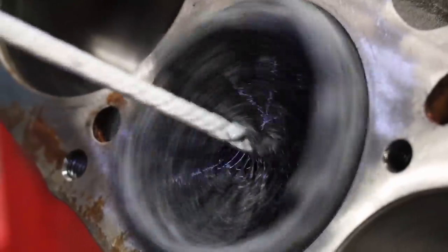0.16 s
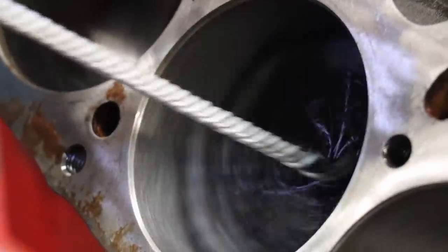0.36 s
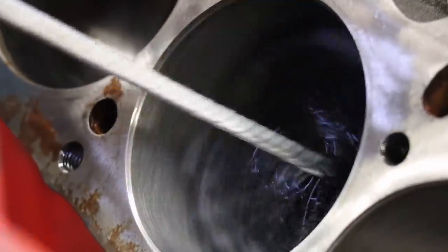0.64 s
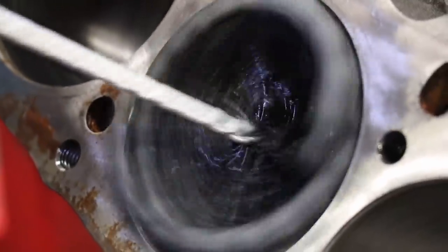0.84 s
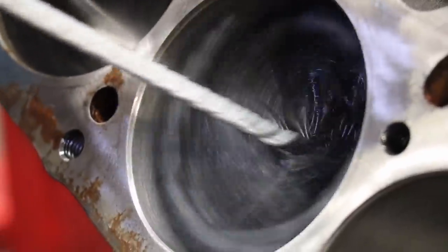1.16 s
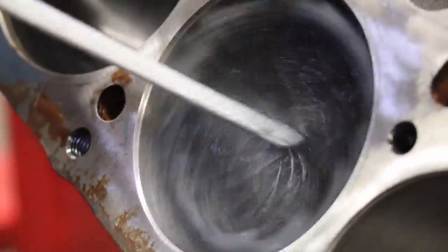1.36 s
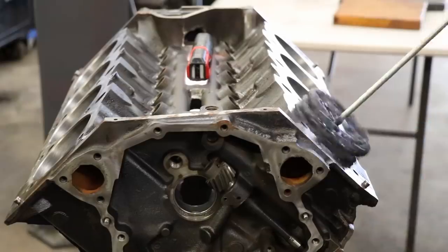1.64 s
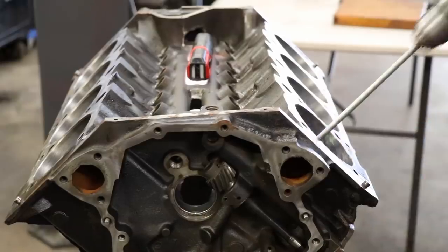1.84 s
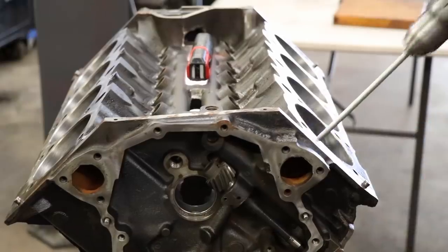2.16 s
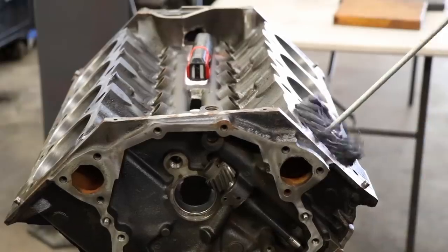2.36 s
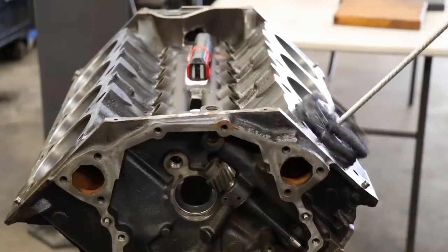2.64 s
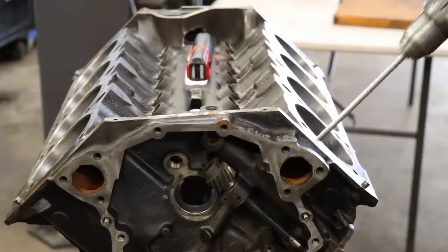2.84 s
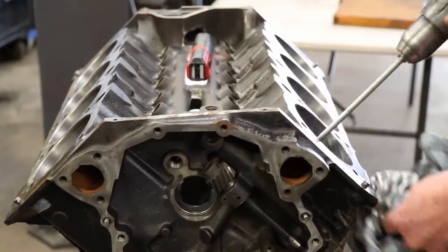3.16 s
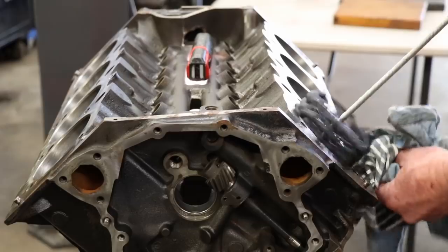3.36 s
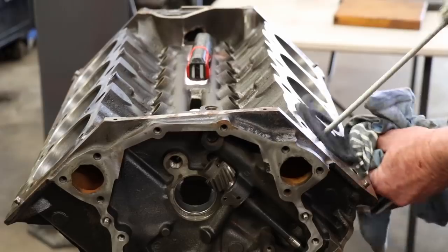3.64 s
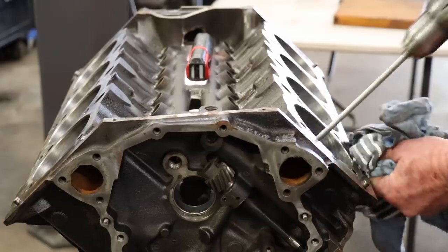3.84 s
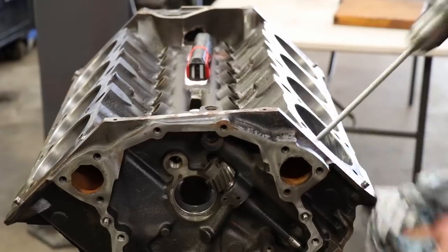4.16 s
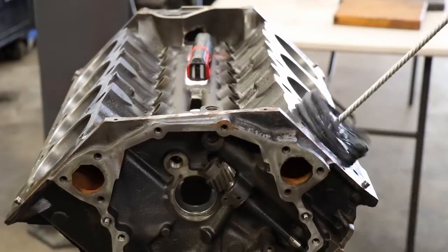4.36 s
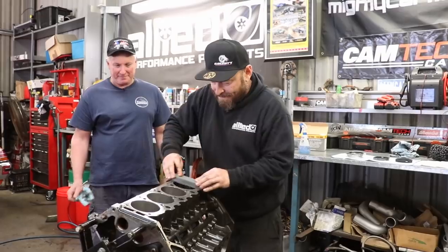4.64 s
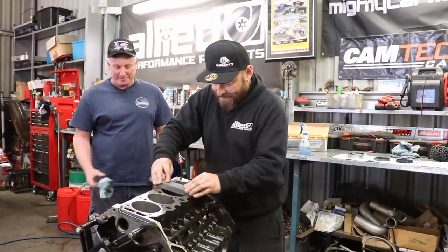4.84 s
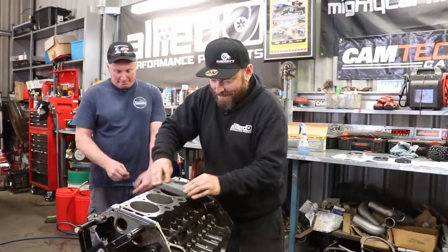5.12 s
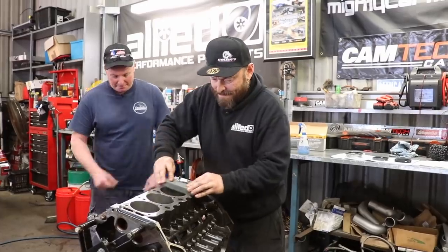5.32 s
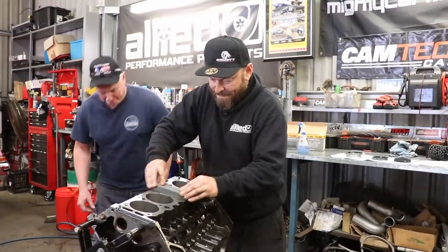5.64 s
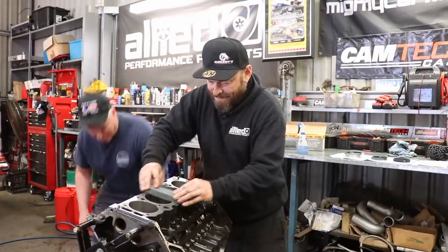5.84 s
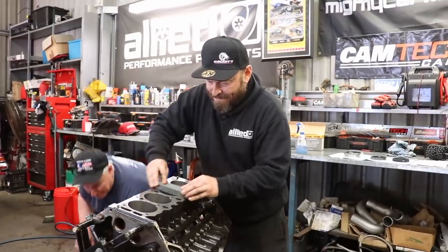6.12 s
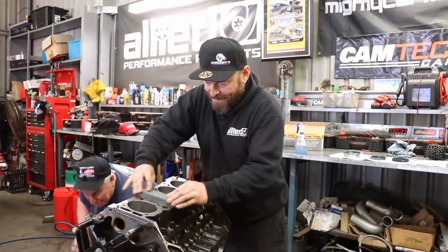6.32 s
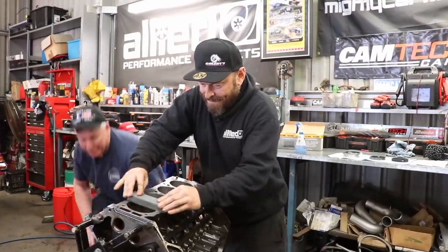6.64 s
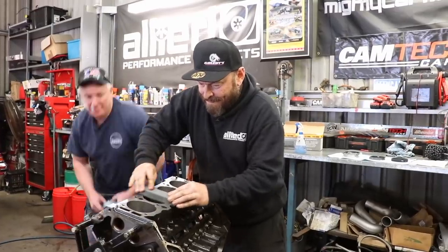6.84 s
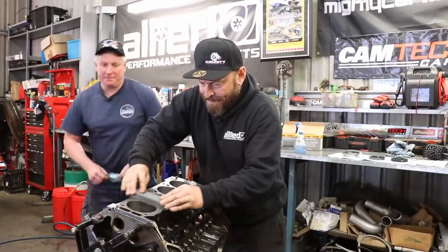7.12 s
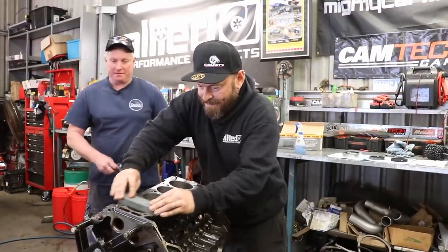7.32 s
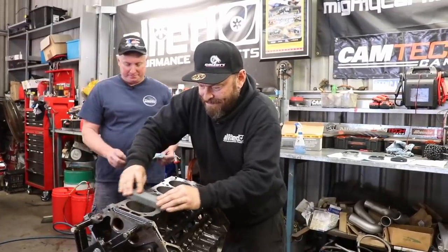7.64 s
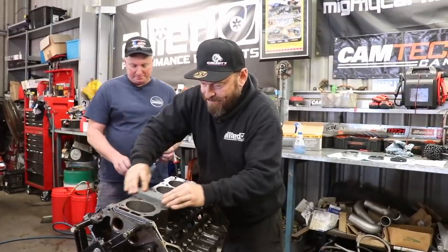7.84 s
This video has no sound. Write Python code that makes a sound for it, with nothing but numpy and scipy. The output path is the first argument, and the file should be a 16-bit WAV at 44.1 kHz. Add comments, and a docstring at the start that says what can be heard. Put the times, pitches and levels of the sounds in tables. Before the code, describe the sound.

From 0 to 1.5 s, a close microphone catches a power drill's steady high whine, around 4.3 kHz, with thin treble switching tones, and the dense, bright rasp of a ball hone in a metal bore, swelling slightly about every 0.4 s. At 1.5 s it cuts to a more distant view: the whine now sags and races with each pump, the rasp is more mid-toned, low hums waver faintly, and sharp treble spits flick out, clustering around 3.2-3.6 s. A thin squeal sinks in pitch from 2 to 3.1 s; a bright swish passes near 2.8 s. At 4.6 s the drill ends abruptly. Until about 8 s a flat stone scrapes rapidly across the block, strokes of roughly 0.18 s dipping at each turn, with metallic ringing. Sharp chips click near 6.1 s, and soft dull bumps occur amid quiet workshop noise.

```python
"""A drill's whine and the rasp of a ball hone in an engine bore come first, close to the microphone.
From 1.52 s the drill is across the block: the hand pumps it in and out and the shaft sags and races.
From 4.64 s a flat stone is pushed and pulled over the block's deck, the strokes sped up, in the shop.
Motor: sines on multiples of the shaft speed. Hone and stone: coloured noise in bands, with resonances.
Squeal and hums are wavering sines, spits and swish noise bursts, chips and bumps short decaying cycles."""
import sys
import numpy as np
from scipy import signal
from scipy.fft import rfft, irfft
from scipy.io import wavfile
from scipy.ndimage import uniform_filter1d

SR = 44100
rng = np.random.default_rng(int(sys.argv[2]) if len(sys.argv) > 2 else 0)


def output_pcm(signal):
    """Save a mono or channel-first signal as 16-bit PCM at the path in sys.argv[1].

    Samples are clipped to [-1, 1] before scaling.
    """
    pcm = np.clip(np.atleast_2d(signal).T, -1, 1) * 32767
    wavfile.write(sys.argv[1], SR, np.round(pcm).astype(np.int16))


N = 351913
TIME = np.arange(N) / SR
CLOSE_END_S, DRILL_END_S = 1.5205, 4.6395
EDGE_HZ = 15800  # upper limit of the microphone chain

# Gear and fan tones of the drill: shaft_multiple, close_db, far_db
GEAR_TONES = [(5, -53.5, -63), (8, -56, -50.5), (10, -50, -53.5), (13, -63, -49), (20, -52, -56),
              (27, -70, -51.5)]
# Sidebands of the speed control's switching: carrier_hz, shaft_multiple
SWITCHING_BANDS = [(7710, -4), (7703, 4), (15399, -4)]
# Their levels, a row for close and a row for far: one level_db for each sideband
SWITCHING_LEVELS = [(-42.5, -40, -48), (-49, -46, -56)]
# Close by, the shaft holds one speed and each push of the hand swells the motor's lines
CLOSE_SHAFT_HZ, CLOSE_WHINE_DB, CLOSE_HUM_DB, CLOSE_FOURTH_DB = 270.8, -42.5, -65, -51.5
PUMP_PERIOD_S, PUMP_PEAK_S, PUMP_DB = 0.376, 0.2, 1.5
# Further off, the shaft sags as the hone binds and races as it frees: time_s, shaft_hz, whine_db
FAR_SPEED = [(1.52, 281, -35), (1.62, 288, -46), (1.69, 286, -40), (1.85, 255, -37), (1.92, 273.8, -33.5),
             (2.04, 277, -42), (2.18, 250, -31.5), (2.25, 319, -46), (2.3, 326, -45), (2.36, 323, -43),
             (2.44, 290, -47), (2.52, 265, -32), (2.57, 290, -52), (2.6, 306, -40), (2.82, 306, -43),
             (2.88, 330, -42), (2.98, 330, -50), (3.1, 305, -37), (3.16, 284, -52), (3.23, 261, -38.5),
             (3.45, 264.3, -33), (3.56, 262, -32.5), (3.62, 322, -44), (3.74, 316, -39), (3.84, 284, -40),
             (3.92, 260, -31), (3.99, 276, -35.5), (4.1, 280, -37), (4.2, 268, -42), (4.3, 295, -50),
             (4.4, 297, -54), (4.53, 274, -47), (4.59, 271, -38), (4.64, 306, -50)]
# The housing favours some speeds of the shaft hum: shaft_hz, level_db
FAR_HUM = [(250, -66), (270, -61), (295, -59.5), (315, -54.5), (332, -67)]
# The fourth multiple of the shaft further off: time_s, level_db
FAR_FOURTH = [(1.52, -51), (1.7, -55), (2.1, -54), (2.2, -67), (3.05, -64), (3.2, -48.5), (3.56, -44.5),
              (3.62, -54), (3.8, -52), (3.9, -46), (4.25, -45.5), (4.64, -49)]
SMEAR_DB_PER_HZ_S = 0.005  # the lines fade while the speed jumps

# Levels of the hone's bands: time_s, body_db, bore_db, rasp_db, grit_db, spit_db
CLOSE_HONE = [(0.06, -43.5, -35.5, -36.5, -32, -41), (0.144, -42.5, -36, -36, -36, -41.5),
              (0.668, -42.5, -35.5, -36, -37, -41), (0.798, -43.5, -34, -34, -34.5, -36.5),
              (1.042, -42.5, -36.5, -36, -39, -43), (1.194, -41.5, -33.5, -35.5, -36, -39),
              (1.5, -43.5, -35.5, -36.5, -36, -41)]
FAR_HONE = [(1.53, -43.5, -36, -37.5, -34, -41), (1.75, -39.5, -36.5, -38, -35.5, -41.5),
            (2.2, -43, -35.5, -36.5, -36, -41), (2.33, -40, -35.5, -36, -36, -39),
            (2.51, -43.5, -35.5, -35, -41, -40), (2.77, -40, -35.5, -37, -36.5, -41),
            (2.81, -41.5, -35.5, -43, -35, -41.5), (3.39, -42, -38.5, -33.5, -39, -37.5),
            (4.17, -43, -38.5, -34.5, -40, -38.5), (4.33, -40.5, -37.5, -32.5, -37.5, -36),
            (4.54, -41, -40, -38.5, -35.5, -46), (4.63, -43, -37.5, -38, -36, -40)]
# Colour of the rasp before each band is levelled: pitch_hz, density_db_per_hz
CLOSE_RASP = [(24, -70), (40, -49), (139, -45), (260, -37.5), (450, -30), (800, -14.5), (1030, -27),
              (1110, -23.5), (1960, -7), (2230, -4.5), (7020, 5.5), (8570, 9.5), (14500, 11), (15600, 5)]
FAR_RASP = [(24, -85), (100, -39), (140, -30), (300, -16.5), (462, -17), (706, -6.5), (1080, -9.5),
            (1390, -6), (1920, -4), (3160, -6), (4260, -3), (5610, -11), (7500, -8), (9010, -9),
            (15600, -18.5)]
# Resonances of the bore: pitch_hz, width_hz, lift_db
CLOSE_BORE = [(795, 85, 0), (2223, 35, 9), (3250, 29, 9), (3490, 54, 8), (4500, 120, 8), (7780, 66, 5),
              (11550, 78, 9)]
FAR_BORE = [(323, 9.2, 4.5), (860, 220, 4), (1110, 79, 4.5), (1315, 13, 1), (1880, 150, 1.5),
            (3550, 240, 2), (4630, 400, 3.5)]
# Sharp treble spits of the hone: centre_s, level_db, pitch_hz
HONE_SPITS = [(1.57, -36, 9350), (1.979, -37, 10500), (2.18, -36, 10900), (3.214, -31.5, 10300),
              (3.295, -38, 11000), (3.365, -35, 11500), (3.5, -38, 10500), (3.561, -35, 11800),
              (3.83, -37, 11000), (4.25, -35, 10500), (4.39, -38, 12500)]
# One squeal of the bore wall: start_s, end_s, pitch_hz, final_sag_hz, level_db
WALL_SQUEAL = (1.96, 3.1, 1270, 99.5, -48.5)
# One bright rush of the balls: centre_s, half_length_s, pitch_hz, width_hz, level_db
BALL_SWISH = (2.76, 0.09, 7200, 1600, -36)

# Turns of the stone: turn_s, pressure_db, high_ring_db, low_ring_db, low_ring_hz
STONE_TURNS = [(4.554, -37.5, -56, -50, 1190), (4.724, -37.5, -52, -49, 1190), (4.916, -38, -45, -51, 1190),
               (5.078, -37, -45, -43.5, 1470), (5.284, -39.5, -47, -51, 1190), (5.452, -37, -47, -48, 1193),
               (5.646, -37, -54, -64, 1190), (5.802, -37.5, -53, -44, 1464), (5.997, -38.5, -53, -51, 1190),
               (6.172, -39.5, -48, -49, 1400), (6.37, -39, -45, -68, 1190), (6.53, -38, -44, -48, 1462),
               (6.731, -39, -48, -50, 1190), (6.892, -38.5, -43, -50, 1205), (7.095, -37, -43, -46, 937),
               (7.271, -38, -45, -60, 1300), (7.463, -37.5, -46, -60, 1190), (7.649, -37.5, -48, -55, 1466),
               (7.82, -37, -42, -58, 1480), (8.01, -37, -47, -54, 1190)]
# Alternate strokes, over the pressure: body_db, middle_db, scrape_db, grit_db, lean (-1 to 1)
PUSH_STROKE = (-6.5, -2.5, -0.5, -1, 0.65)
PULL_STROKE = (-6, -1, 1, -0.5, 0)
# Colour of the scrape before each band is levelled: pitch_hz, density_db_per_hz
STONE_SCRAPE = [(24, -60), (60, -35), (623, -14.5), (862, -14), (1190, -6.5), (1690, -6.5), (3500, -1.5),
                (4100, -4.5), (4500, 1.5), (6100, -2), (6800, -8), (10700, -15), (13100, -12.5),
                (15600, -19.5)]
# Resonances of the deck: pitch_hz, width_hz, lift_db
DECK_MODES = [(750, 90, 4.5), (1916, 46, 7.5), (2062, 42, 8), (2350, 40, 6.5), (3480, 21, 8),
              (4700, 160, 2), (5120, 360, 3)]
HIGH_RING_HZ, HIGH_RING_WIDTH_HZ, LOW_RING_WIDTH_HZ = 5810, 70, 40

# Chips under the stone: start_s, peak_db, pitch_hz
CHIPS = [(6.0755, -11.5, 3750), (6.092, -19, 3900), (6.1402, -22, 5200), (6.1472, -13, 4960)]
# Dull bumps: start_s, peak_db, pitch_hz, cycles
BUMPS = [(4.44, -48, 185, 6), (4.44, -41, 329, 8.2), (5.2, -56, 70, 1.6), (5.536, -50, 210, 4),
         (5.7, -46, 180, 1.5), (6.05, -57, 79.8, 2.2), (6.0748, -31.5, 510, 1), (6.218, -52, 269, 4),
         (6.3, -41, 410, 5.2), (6.32, -51, 206, 4.8), (6.5, -55, 100, 1.5), (6.901, -48, 230.6, 2.8),
         (7.45, -54, 149, 2)]
# Low hums heard further off: pitch_hz, level_db
LOW_HUMS = [(143, -74.5), (190, -71), (232, -70.5)]
# Colour of the shop's noise behind the stone: pitch_hz, density_db_per_hz
SHOP_COLOUR = [(24, -61), (40, -17), (623, -8), (841, -5.5), (1190, -1), (3950, 0.5), (4710, -5.5),
               (7020, -6), (13100, -26), (15600, -22)]
SHOP_DB = -48.5


def motor(shaft_hz, whine_db, hum_db, fourth_db, place):
    """Multiples of the shaft speed and switching sidebands move together; place is 0 close, 1 far."""
    whine_gain = amp(whine_db + 2.0 * drift(60) + 0.93 * drift(6))
    lines = whine_gain * tone(16 * shaft_hz, blur_hz=12.4)
    lines += amp(hum_db + 3.3 * drift(8)) * tone(shaft_hz, blur_hz=1.74)
    fourth_gain = amp(fourth_db + 1.9 * drift(30) + 1.7 * drift(6))
    lines += fourth_gain * tone(4 * shaft_hz, blur_hz=3.4)
    for multiple, *level_db in GEAR_TONES:
        lines += amp(level_db[place] + 3.3 * drift(12)) * tone(multiple * shaft_hz, blur_hz=8.1)
    for (carrier_hz, multiple), level_db in zip(SWITCHING_BANDS, SWITCHING_LEVELS[place]):
        gain = amp(level_db + 1.8 * drift(40) + 2.0 * drift(8))
        lines += gain * tone(carrier_hz + multiple * shaft_hz, blur_hz=5.3)
    return lines


def motor_close():
    """A steady shaft speed; the lines swell with the pumping hand."""
    pump_db = PUMP_DB * np.cos(2 * np.pi * (TIME - PUMP_PEAK_S) / PUMP_PERIOD_S)
    lines = motor(CLOSE_SHAFT_HZ, CLOSE_WHINE_DB, CLOSE_HUM_DB, CLOSE_FOURTH_DB, place=0)
    return amp(pump_db) * lines


def motor_far():
    """The shaft speed varies with the hone's grip and sets how loud the hum is."""
    shaft_hz, whine_db = columns(FAR_SPEED, TIME)
    shaft_hz = uniform_filter1d(shaft_hz, size=800)
    smear_db = -SMEAR_DB_PER_HZ_S * abs(np.gradient(shaft_hz) * SR)
    fourth_db, = columns(FAR_FOURTH, TIME)
    return amp(smear_db) * motor(shaft_hz, whine_db, read(FAR_HUM, shaft_hz), fourth_db, place=1)


def hone(rows, spectrum, modes):
    """Many grit balls scrape the wall; the treble spits in bursts as single balls skip."""
    body_db, bore_db, rasp_db, grit_db, spit_db = columns(rows, TIME)
    noise = coloured(spectrum, modes, size=2048, patchy_db=1.02, mode_swing=0.4)
    grains_db = gritty(0.67, grain_s=0.002)
    skips_db = gritty(1.28, grain_s=0.0072)
    levels_db = [body_db, bore_db + grains_db, rasp_db + grains_db,
                 grit_db + grains_db + 0.38 * skips_db, spit_db + grains_db + skips_db]
    return amp(0.51 * drift(6)) * shaped(noise, [400, 1400, 3400, 6000, 9500, 15500], levels_db)


def spits(length_s=0.0087, width_hz=1500):
    """Each spit is a brief clump of bright grains under a bell-shaped envelope."""
    out = np.zeros(N)
    t = np.arange(-1300, 1300) / SR
    envelope = np.exp(-.5 * (t / length_s) ** 2)
    smoother = np.hanning(int(SR / width_hz))
    for centre_s, level_db, hz in HONE_SPITS:
        grains = rng.standard_normal(len(t)) * rng.exponential(1, len(t))
        grains = np.convolve(grains, smoother, "same")
        bright = evened(grains * np.cos(2 * np.pi * hz * t))
        out[round(centre_s * SR) - 1300:][:len(t)] += amp(level_db) * bright * envelope
    return out


def squeal():
    """A thin tone of the bore wall that flutters and sags away."""
    start, end, hz, sag_hz, level_db = WALL_SQUEAL
    u = np.clip((TIME - start) / (end - start), 0, 1)
    line = tone(hz - sag_hz * u ** 2.6, blur_hz=5.6)
    return amp(level_db + 3.5 * drift(30)) * line * between(start, end, fade_s=0.092)


def swish():
    """One wide, bright rush of the balls: band noise that swells and falls."""
    centre_s, length_s, hz, width_hz, level_db = BALL_SWISH
    envelope = np.exp(-.5 * ((TIME - centre_s) / length_s) ** 2)
    return amp(level_db) * ringing(hz, width_hz) * envelope


def stone():
    """Sped-up strokes: the stone stops at each turn; the finer the grit sound, the more it needs speed."""
    turn, *strokes = np.transpose(STONE_TURNS)
    k = np.clip(np.searchsorted(turn, TIME) - 1, 0, len(turn) - 2)
    u = np.clip((TIME - turn[k]) / (turn[k + 1] - turn[k]), 0, 1)  # progress of the stroke
    pressure_db, high_db, low_db = (uniform_filter1d(c[k], 600) for c in strokes[:3])
    low_ring_hz = strokes[3][k]
    directions = np.transpose([PUSH_STROKE, PULL_STROKE])
    body_db, middle_db, scrape_db, grit_db, lean = (uniform_filter1d(c[k % 2], 600) for c in directions)
    speed_db = 20 * np.log10(np.sin(np.pi * u ** 0.89) + 0.014)
    bite_db = 20 * np.log10(np.sin(np.pi * u ** 0.96) + 0.05)  # the fine grit's own curve over the stroke
    noise = coloured(STONE_SCRAPE, DECK_MODES, size=2048, patchy_db=2.5, mode_swing=0.92)
    grains_db = gritty(0.27, grain_s=0.0018)
    levels_db = [body_db + 0.13 * speed_db, middle_db + 0.32 * speed_db + grains_db,
                 scrape_db + 0.59 * speed_db + grains_db, grit_db + 0.79 * bite_db + grains_db]
    scrape = amp(pressure_db) * shaped(noise, [600, 1700, 4200, 7000, 15500], levels_db)
    rings = amp(high_db + 2.9 * drift(30)) * ringing(HIGH_RING_HZ, HIGH_RING_WIDTH_HZ)
    rings += amp(low_db + 4.4 * drift(30)) * ringing(low_ring_hz, LOW_RING_WIDTH_HZ)
    lean_db = 5.3 * lean * (u - .5)  # a positive lean grows louder along the stroke
    return amp(lean_db) * (scrape + amp(0.35 * speed_db - 1.0) * rings)


def blow(start_s, peak_db, hz, cycles):
    """A chip or bump: a few cycles that rise fast and die away."""
    u = np.clip(TIME - start_s, 0, 1) * hz / cycles
    envelope = np.e * 3 * u * np.exp(-3 * u)  # peaks at 1
    return amp(peak_db) * envelope * np.sin(2 * np.pi * cycles * u)


def hums():
    """Low tones further off that waver in pitch and come and go."""
    out = np.zeros(N)
    for hz, level_db in LOW_HUMS:
        out += amp(level_db + 3.5 * drift(8)) * tone(hz * (1 + 0.0203 * drift(3)), blur_hz=2.43)
    return out


def shop():
    """The room behind the stone: patchy coloured noise without resonances."""
    return amp(SHOP_DB) * evened(coloured(SHOP_COLOUR, [], size=1024, patchy_db=3.5, mode_swing=0))


def amp(db):
    """dB to gain."""
    return 10 ** (np.asarray(db) / 20)


def evened(x):
    """Scales to rms 1."""
    return x / np.sqrt(np.mean(x ** 2) + 1e-20)


def read(points, hz):
    """A pitch table read on a log-frequency axis."""
    f, value = np.transpose(points)
    return np.interp(np.log(hz + 1), np.log(f + 1), value)


def columns(rows, t):
    """Every column of a curve table at the times t."""
    s, *rest = np.transpose(rows)
    return [np.interp(t, s, c) for c in rest]


def drift(rate_hz):
    """Slow chance of rms 1: sines of random phase up to the rate."""
    rates = np.geomspace(rate_hz / 10, rate_hz, num=20)
    return evened(sum(np.sin(2 * np.pi * (f * TIME + rng.random())) for f in rates))


def between(t0, t1, fade_s=0.00096):
    """Open from t0 to t1 with short fades."""
    return np.clip(np.minimum(TIME - t0, t1 - TIME) / fade_s, 0, 1)


def tone(hz, blur_hz):
    """A sine whose phase wanders, so that the line has a width; rms 1."""
    steps = uniform_filter1d(uniform_filter1d(rng.standard_normal(N), size=150), size=150)
    wander = np.cumsum(steps) * np.sqrt(2 * np.pi * blur_hz / SR)
    return np.sqrt(2) * np.sin(2 * np.pi * np.cumsum(hz * np.ones(N)) / SR + wander)


def ringing(hz, width_hz):
    """Noise heard through one mode; rms 1."""
    a, b = uniform_filter1d(rng.standard_normal((2, N)), int(SR / width_hz / 2))
    turn = 2 * np.pi * np.cumsum(hz * np.ones(N)) / SR
    return evened(a * np.cos(turn) + b * np.sin(turn))


def gritty(spread_db, grain_s):
    """Uneven pressure of loose grains, in dB at mean power 1: it spits upward."""
    jolts = rng.exponential(1, N) ** 2
    smooth = uniform_filter1d(jolts - jolts.mean(), max(int(grain_s * SR), 1))
    db = spread_db * evened(smooth)
    return db - 10 * np.log10(np.mean(amp(db) ** 2))


def coloured(spectrum, modes, size, patchy_db, mode_swing):
    """Noise of a given colour with drifting patches; each resonance swells and fades by itself."""
    frames = 4 * N // size + 8
    hz = np.fft.rfftfreq(size, 1 / SR)
    a, b, patches = rng.standard_normal((frames, len(hz), 3)).T
    patches = uniform_filter1d(patches, size // 100, 0)  # across pitch
    patches = evened(uniform_filter1d(patches, 8000 // size, 1))  # along time
    field_db = read(spectrum, hz)[:, None] + patchy_db * patches
    for f, width, lift_db in modes:
        swing = np.tanh(evened(uniform_filter1d(rng.standard_normal(frames), 20000 // size)))
        peak = 1 / (1 + (2 * (hz[:, None] - f) / width) ** 2)
        field_db += lift_db * peak * (1 + mode_swing * swing)
    return signal.istft((a + 1j * b) * amp(field_db), nperseg=size, noverlap=3 * size // 4)[1][:N]


def shaped(x, edges_hz, levels_db):
    """Each band between the edges is evened and follows its own level; the outer bands run on to the ends."""
    z, hz, out = rfft(x), np.fft.rfftfreq(N, 1 / SR), np.zeros(N)
    for k, level_db in enumerate(levels_db):
        low, high = edges_hz[k], edges_hz[k + 1]
        unit = irfft(z * (hz > low) * (hz <= high), N).std()
        over_low = 1 / (1 + (low / (hz + 1)) ** 12) if k else 1
        over_high = 1 / (1 + (high / (hz + 1)) ** 12) if k < len(levels_db) - 1 else 0
        out += irfft(z * (over_low - over_high), N) / unit * amp(level_db)
    return out


def scene():
    """Drill close, drill across the block, then the stone on the deck."""
    close = motor_close() + hone(CLOSE_HONE, CLOSE_RASP, CLOSE_BORE)
    far = motor_far() + hone(FAR_HONE, FAR_RASP, FAR_BORE) + squeal() + swish() + hums()
    drill = close * between(0, CLOSE_END_S) + far * between(CLOSE_END_S, DRILL_END_S) + spits()
    deck = (stone() + shop()) * between(DRILL_END_S, 9, fade_s=0.0065)
    chips = sum(blow(*row, cycles=1.9) for row in CHIPS)
    bumps = sum(blow(*row) for row in BUMPS)
    return np.array([drill + deck + chips + bumps] * 2)


def record(dry):
    """One microphone, weak in the deep bass, on both channels; then the band limit."""
    thinned = signal.lfilter(*signal.butter(1, 60, "high", fs=SR), dry)
    band_limit = signal.firwin(1023, EDGE_HZ, window=("kaiser", 10), fs=SR)
    return signal.oaconvolve(thinned, band_limit[None], "same")


dry = scene()
out = record(dry)
output_pcm(out)
```